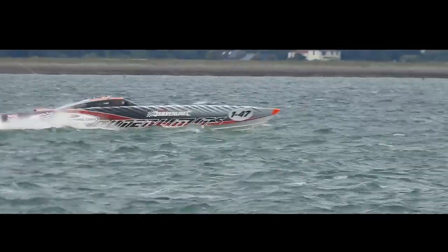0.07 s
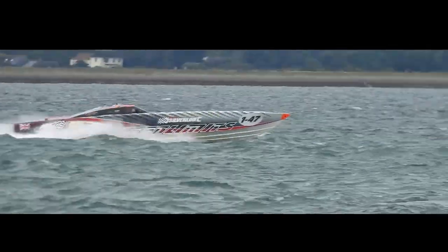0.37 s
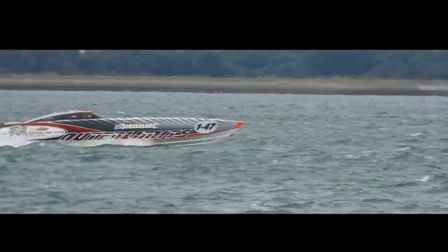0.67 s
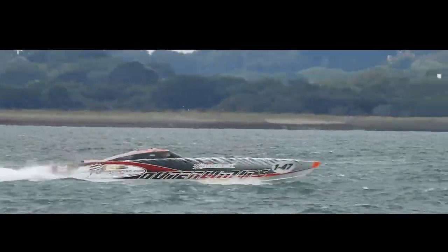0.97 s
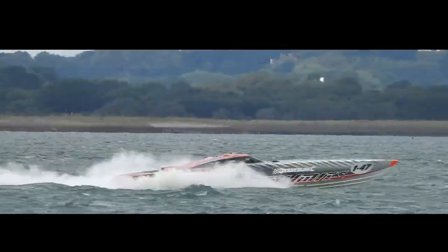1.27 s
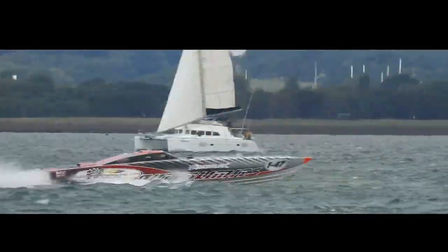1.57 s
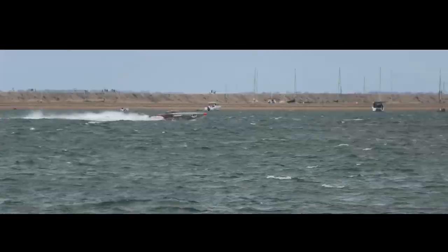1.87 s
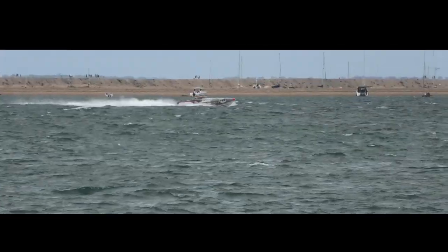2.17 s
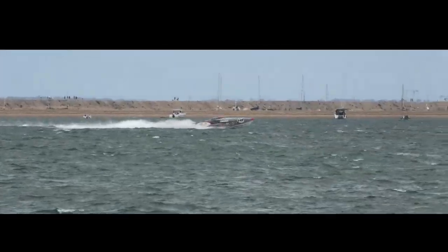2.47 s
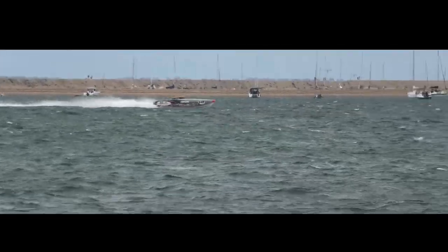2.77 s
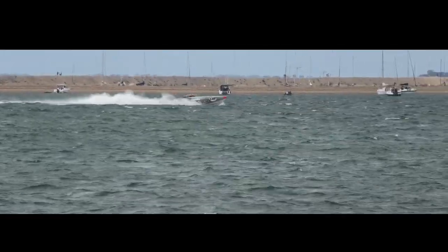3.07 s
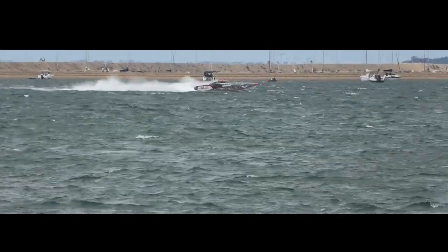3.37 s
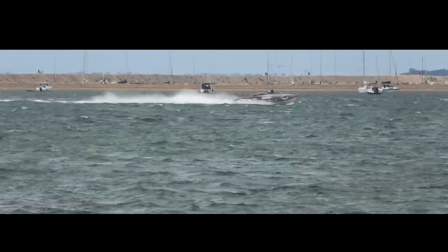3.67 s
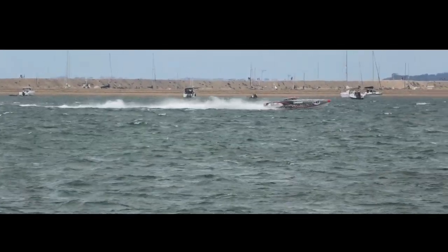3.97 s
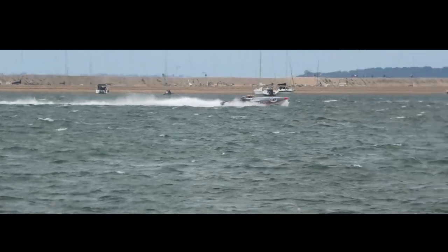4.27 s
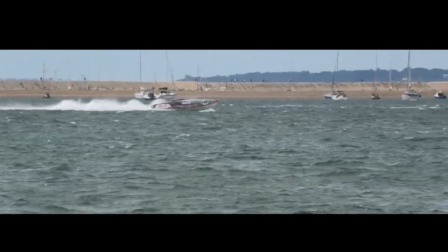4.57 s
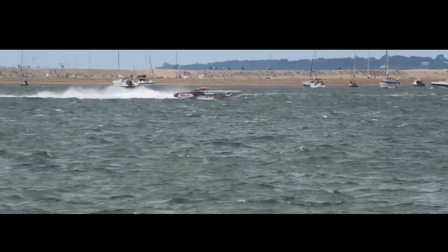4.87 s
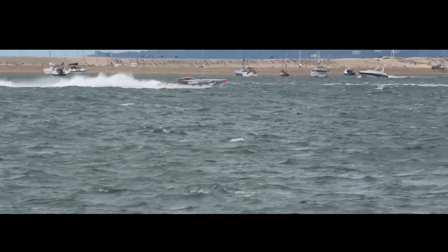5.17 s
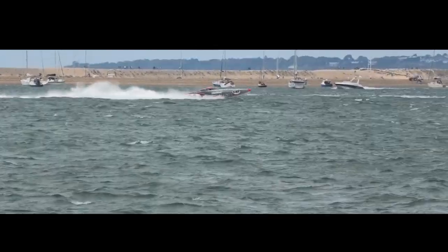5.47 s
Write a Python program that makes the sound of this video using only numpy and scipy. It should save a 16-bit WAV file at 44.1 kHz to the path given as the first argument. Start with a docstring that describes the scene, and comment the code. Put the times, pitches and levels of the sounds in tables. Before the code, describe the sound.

A racing powerboat engine drones past with hissing spray and wind buffeting the microphone, then gives way to gusts over faint distant rumble and waves.

```python
"""The V8 exhaust of a racing powerboat drones across choppy water, heard from a windy shore, near and then far.
Periodic cylinder firings give harmonics that follow the engine speed, over a burble of gas in water.
Near, drops of spray hiss and spatter while turbulent wind roars and knocks at the microphone ports.
Then the boat is a faint, distant rumble behind the wash of the waves, and gusts make a gain control
duck the water. A limiter holds down the peaks throughout."""
import sys
import numpy as np
from scipy import signal
from scipy.fft import rfft, irfft, next_fast_len
from scipy.io import wavfile
from scipy.ndimage import uniform_filter1d, minimum_filter1d, map_coordinates

SR = 44100
rng = np.random.default_rng(int(sys.argv[2]) if len(sys.argv) > 2 else 0)


def to_wav(sig):
    """Store sig (one row per channel, or 1-D mono) as 16-bit WAV at the path in sys.argv[1].

    Samples outside -1..1 are clipped; the rate is SR.
    """
    pcm = np.clip(np.atleast_2d(sig), -1, 1) * 32767
    pcm = np.round(pcm).astype(np.int16)
    wavfile.write(sys.argv[1], SR, pcm.T)  # frames by channels


N = 247842

NEAR_END_S, FAR_START_S = 1.837, 1.848
CRUISE_HZ = 32.74  # engine cycle rate of the distant boat
KNOCK_HZ, TEARING_HZ = 500, 600  # nominal centres of KNOCK_SPECTRUM and TEARING_SPECTRUM

# Levels in the tables are relative: trims, flutter and gain control act on them later.
# engine speed, rising as the propeller lifts clear, sagging as the hull digs in: (time [s], cycles [Hz])
ENGINE_SPEED = [(0, 32.6), (.132, 32.4), (.22, 32.7), (.29, 32.9), (.44, 33.2), (.51, 34.7), (.6, 34.9),
                (.744, 32.6), (.85, 33.5), (1.0, 32.1), (1.08, 32.9), (1.18, 31.8), (1.33, 33.5),
                (1.4, 32.2), (1.47, 31.9), (1.59, 32.1), (1.645, 33.4), (1.72, 31.7), (1.83, 31.6)]
# pulse strength of the eight cylinders within one cycle: (amplitude [ratio])
CYLINDER_STRENGTH = [0.92, 0.11, 0.39, 0.79, 0.6, 0.92, 0.57, 0.92]
# envelopes of the engine orders: (time [s], level [dB])
BANK_LEVEL = [(0, -23.5), (.1, -34), (.17, -30.5), (.3, -31), (.39, -28.5), (.44, -56), (.5, -28),
              (.59, -23), (.82, -27), (.88, -36.5), (1.2, -40), (1.28, -27.5), (1.46, -24.5), (1.56, -39),
              (1.63, -25.5), (1.7, -37.5), (1.77, -24), (1.83, -31)]
FIRING_LEVEL = [(0.0, -30.5), (.07, -22.5), (.16, -33), (.22, -24.5), (0.32, -22.5), (0.356, -38),
                (0.4, -23), (0.524, -41.5), (0.58, -30.5), (0.754, -34), (.86, -42.5), (.99, -25.5),
                (1.06, -32.5), (1.16, -26.5), (1.28, -39.5), (1.37, -19.5), (1.45, -42), (1.55, -32.5),
                (1.63, -24), (1.69, -34), (1.83, -40)]
NINTH_LEVEL = [(0, -36), (.18, -37.5), (.29, -31), (.35, -39), (.43, -31), (.5, -44), (.6, -42),
               (.73, -31.5), (.8, -46), (1.0, -38), (1.18, -36), (1.3, -45), (1.48, -44), (1.57, -31.5),
               (1.7, -43), (1.83, -47)]
# exhaust spectra: (frequency [Hz], level [dB])
NEAR_EXHAUST_SPECTRUM = [(50, -40.5), (85, -16), (100, -11.5), (135, -2), (200, 2.5), (300, -4), (370, -15),
                         (700, -18), (1500, -34), (4000, -65)]
FAR_EXHAUST_SPECTRUM = [(40, -38), (75, -24), (115, -4), (170, 6), (260, 1.5), (400, -4.5), (900, -19.5),
                        (3000, -41), (8000, -110)]

# wind envelopes: (time [s], level [dB])
NEAR_ROAR_LEVEL = [(0, -42), (.3, -35.5), (.42, -33.5), (.53, -34.5), (.6, -36), (.66, -35), (.8, -35.5),
                   (.87, -32.5), (1.05, -33), (1.25, -31.5), (1.37, -41), (1.49, -32), (1.68, -33),
                   (1.82, -32)]
BREEZE_LEVEL = [(1.85, -42.5), (2.2, -40), (2.42, -48), (2.62, -34.5), (2.85, -35.5), (3.06, -52.5),
                (3.27, -38), (3.5, -41), (3.62, -36.5), (4.05, -40), (4.32, -43), (4.48, -38.5),
                (4.6, -43.5), (4.88, -38.5), (5.2, -43), (5.6, -41.5)]
# veering of the breeze between the microphone ports: (time [s], left minus right [dB])
BREEZE_BALANCE = [(1.86, 2.5), (2.3, 1), (2.87, 5.0), (3.22, -2), (3.9, -1.5), (4.4, -0.5), (5.35, 0),
                  (5.6, 1)]
# brief changes in the breeze, mostly lulls: (mid time [s], duration [s], level change [dB])
BREEZE_LULLS = [(2.595, .018, -5), (4.17, 0.018, 1), (4.29, 0.025, -5), (4.775, 0.04, -2.5),
                (5, 0.017, -16), (5.509, 0.025, -2)]
# hard blasts of wind: (mid time [s], duration [s], level [dB], centre [Hz])
NEAR_BLASTS = [(0.149, 0.057, -34.5, 597), (0.364, 0.023, -31, 900), (0.436, 0.028, -38.5, 1210),
               (0.547, 0.069, -44.5, 1680), (0.644, .014, -38, 1000), (0.864, 0.033, -24, 623),
               (0.905, 0.02, -29.5, 1010), (0.945, 0.04, -30, 700), (1.011, 0.013, -33, 600),
               (1.054, 0.052, -41, 777), (1.468, 0.041, -32, 550.2), (1.595, 0.069, -36, 593),
               (1.657, 0.021, -38.5, 1100), (1.811, 0.029, -39, 950)]
# gusts: (mid time [s], duration [s], level [dB], left minus right [dB], relative fizz level [dB])
FAR_GUSTS = [(2.068, 0.029, -35, 8, -28), (2.28, 0.12, -30.5, 4, -27), (2.488, 0.064, -33.5, 3, -30),
             (2.644, 0.034, -29, 8, -36), (2.729, 0.15, -19, 3, -23), (2.939, 0.063, -21.5, 1, -22),
             (4.116, 0.06, -21.5, 2.5, -29.5), (4.206, 0.038, -23, -1.5, -20.5),
             (4.251, 0.051, -19.5, 2, -24), (4.685, 0.064, -38, -2, -28), (4.928, 0.016, -22, -9, -24.5),
             (4.965, 0.041, -21.5, 2, -25), (5.049, 0.075, -31, -4.5, -22), (5.129, 0.027, -24, 8.5, -35),
             (5.383, 0.059, -25.5, -2.5, -22), (5.454, 0.06, -29.5, 2.5, -30), (5.595, 0.073, -21, 5, -21)]
# impacts of the hardest eddies: (time [s], peak level [dB], left minus right [dB], centre [Hz])
HARD_KNOCKS = [(0.022, -23, 0, 533), (.134, -25, 4, 500), (.149, -25, 1, 596), (.216, -23.5, 1, 502),
               (.36, -25.5, -15, 970), (.397, -25.5, -3, 694), (.43, -22.5, -19, 884),
               (0.498, -24, 5.5, 605), (.638, -25, -5, 860), (0.747, -26.5, -2, 537), (.771, -22, 4, 595),
               (0.859, -7.5, 9, 538), (.939, -13, -17, 690), (.955, -13, 9.5, 700), (.975, -30, -10, 734),
               (1.003, -13.5, 5, 480), (1.033, -24, 18, 640), (1.193, -28, 4, 810), (1.222, -20, -10, 477),
               (1.252, -24.5, -18, 596), (1.494, -19, 3.5, 520), (1.773, -20, 8, 450),
               (1.797, -25.5, 9, 498), (2.06, -31, 12, 463), (2.298, -23, 9, 397), (2.637, -19, 8, 470),
               (2.691, -24, -2, 655), (2.717, -27, 5, 620), (2.755, -12, 13, 450), (2.798, -19, 6, 387),
               (2.927, -17.5, 7, 480), (2.998, -34.5, 9, 885), (3.27, -33, -6, 560), (3.315, -31.5, 1, 550),
               (3.823, -29.5, 1, 500), (4.098, -22, -5, 420), (4.11, -16.5, -12, 480),
               (4.192, -18.5, 4, 420), (4.25, -18, 4, 484), (4.924, -25.5, 6, 324), (4.932, -18, 9, 595),
               (4.955, -20, -7, 476), (5.013, -30, 0, 560), (5.034, -21.5, 8, 435), (5.121, -21, -12, 557),
               (5.298, -34, -2, 480), (5.341, -37, 9, 380), (5.362, -28, -3.5, 500), (5.448, -26, 3, 474),
               (5.47, -26, -1.5, 483), (5.562, -19, -2, 477)]
# wind snaps: (time [s], duration [s], peak level [dB], left minus right [dB], top octave gain [dB])
WIND_CRACKLES = [(0.356, 0.0024, -36.5, -10, -25), (0.645, .002, -41, 4, -16), (.67, .002, -40.5, 3, -24),
                 (.691, .002, -33.5, 2, -24), (.841, .0015, -38.5, -5.5, -21.5),
                 (0.898, 0.0027, -27.5, 34, -9.5), (.903, .004, -32, 19, -23.5),
                 (0.921, .003, -30.5, 38, -19), (0.923, .001, -35.5, -21, -5.5),
                 (1.128, .002, -35, -7, -28), (1.162, .002, -37, -8.5, -29), (1.194, .003, -39, 5, -28),
                 (1.269, 0.0045, -35, -25, -18.5), (1.417, 0.0022, -42, -15, -23),
                 (1.657, 0.0082, -35.5, 24, -20.5), (1.665, .0028, -17, 46, -32),
                 (1.675, .005, -38.5, 16, -19.5), (1.816, 0.0026, -33, 25, -22)]
# spectra of wind at the microphone: (frequency [Hz], level [dB])
RUMBLE_SPECTRUM = [(20, -33.5), (45, -14.5), (75, -12.5), (110, -2.5), (200, -7.5), (330, -1), (600, -36.5),
                   (2000, -61), (16000, -120)]
ROAR_SPECTRUM = [(40, -34.5), (120, -14), (250, -5), (420, 3.5), (750, -8.5), (1200, -12.5), (1800, -20),
                 (2300, -29), (4000, -37), (9000, -51.5), (16000, -62)]
TEARING_SPECTRUM = [(100, -41.5), (380, 2), (560, 2.5), (760, 3), (900, -4), (1150, -9), (1600, -18),
                    (2100, -27), (5000, -47.5), (16000, -76)]
BREEZE_SPECTRUM = [(30, -53), (65, -32), (110, -6), (170, 1.5), (250, 2.5), (480, 1.5), (800, -5.5),
                   (1300, -14.5), (2000, -27.5), (3000, -42.5), (4500, -48), (16000, -110)]
BUFFET_SPECTRUM = [(30, -39), (70, -52), (110, -17.5), (170, 3), (250, 5), (480, 4.5), (800, -4),
                   (1300, -13.5), (2000, -27), (3000, -41), (4500, -54), (16000, -99)]
FIZZ_SPECTRUM = [(600, -4), (1500, 13), (2600, 2), (3800, -10.5), (5500, -19.5), (16000, -40)]
KNOCK_SPECTRUM = [(30, -54), (65, -29), (110, -11.5), (200, 4.5), (500, 11), (900, 0.5), (1500, -15.5),
                  (2500, -29), (4500, -48.5), (10000, -58)]
CRACKLE_SPECTRUM = [(300, 2), (1200, 6.5), (2200, 6), (6500, -1)]
# likeness of the wind in the two channels: (frequency [Hz], correlation [-1 to 1])
ROAR_CORRELATION = [(60, 0.44), (150, 0.32), (260, 0.48), (500, 0.18), (1000, 0.097), (1900, 0.21)]
BREEZE_CORRELATION = [(100, 0.93), (260, -0.091), (500, -0.55), (1000, -0.46), (2500, -0.72)]
BUFFET_CORRELATION = [(120, 0.58), (260, -0.24), (500, -0.34), (1000, -0.34), (3000, 0.088)]

# water envelopes: (time [s], level [dB])
HISS_LEVEL = [(0, -52.5), (.25, -57), (.35, -55), (.45, -59.5), (.69, -54), (.8, -61), (.97, -70),
              (1.15, -63), (1.43, -57), (1.54, -65.5), (1.82, -59.5)]
WASH_LEVEL = [(1.86, -62.5), (2.15, -61), (2.5, -66), (2.9, -67.5), (3.05, -72), (3.35, -69.5),
              (3.85, -60.5), (4.1, -62.5), (4.4, -65), (4.88, -58.5), (5.1, -65), (5.6, -58.5)]
SEA_LEVEL = [(1.86, -61.5), (2.15, -59), (2.55, -65.5), (3.05, -71.5), (3.5, -67), (3.9, -71), (4.45, -64),
             (4.8, -60.5), (5.15, -64), (5.6, -64)]
# water spectra: (frequency [Hz], level [dB])
HISS_SPECTRUM = [(500, -33), (1500, 8.5), (2300, 4.5), (3300, 5), (3800, -1.5), (5000, 1.7), (6700, 2.5),
                 (7600, -8), (9500, -17.5), (15500, -34.5)]
SPATTER_SPECTRUM = [(700, -15.5), (1600, 2.5), (3000, 2), (6500, -1), (8000, -9.5), (15500, -20)]
WASH_SPECTRUM = [(300, -5), (900, 13), (1800, 15.5), (2800, 10), (4000, 4.5), (6500, 0.5), (9500, -1.5),
                 (12500, -6.5), (15500, -14)]
SEA_SPECTRUM = [(400, -16), (1000, 5.5), (2000, 0.5), (2900, -4.5), (3800, -10), (6000, -36), (16000, -45)]
# likeness of the water in the two channels: (frequency [Hz], correlation [-1 to 1])
HISS_CORRELATION = [(2000, 1), (4000, 0.7), (6000, 0.21), (12000, .2)]
WASH_CORRELATION = [(1000, .1), (3500, 0.39), (7000, 0.92)]
# brief high whistles: (mid time [s], duration [s], frequency [Hz], level [dB])
HIGH_SQUEAKS = [(0.366, 0.033, 6100, -46.5), (3.163, .008, 6400, -70), (3.354, 0.0045, 9600, -68)]


def near_engine():
    """Harmonics of the engine cycle: three strong orders swell and fade as the hull bounces."""
    cycles = np.cumsum(curve(ENGINE_SPEED)) / SR
    bank = amp(curve(BANK_LEVEL) - 4.5) * engine_order(cycles, order=5)
    firing = amp(curve(FIRING_LEVEL) - 4) * engine_order(cycles, order=8)
    ninth = amp(curve(NINTH_LEVEL) - 0.5) * engine_order(cycles, order=9)
    return bank + firing + ninth + amp(-29) * exhaust(cycles, NEAR_EXHAUST_SPECTRUM, burble=2.37)


def engine_order(cycles, order):
    """Phase modulation: turbulent air makes one harmonic wander on its way to each channel."""
    phase = 2 * np.pi * (order * cycles + rng.random())
    wander = 0.2 * wobble(16) + 0.3 * np.array([wobble(40), wobble(40)])
    return np.sqrt(2) * np.sin(phase + wander)


def exhaust(cycles, spectrum, burble):
    """Source and filter: firing pulses and the churn of gas blown through water share one spectrum."""
    pulses = unit(firings(cycles, scatter_db=7.5, jitter_s=0.0006))
    churn = noise(spectrum, [(150, 0.093), (280, 0.36), (500, 0.016)])
    return unit(unit(shaped(pulses, spectrum)) + burble * churn)


def firings(cycles, scatter_db, jitter_s):
    """A quasi-periodic pulse train: one impulse per cylinder firing, uneven in size and time."""
    count = len(CYLINDER_STRENGTH)
    index = np.arange(1, int(cycles[-1] * count))
    timing, strength = rng.standard_normal((len(index), 2)).T
    times = np.interp(index / count, cycles, clock()) + jitter_s * timing
    sizes = np.take(CYLINDER_STRENGTH, index % count) * amp(scatter_db * strength)
    return np.bincount(np.clip(times * SR, 0, N - 1).astype(int), sizes, N)


def far_engine():
    """Attenuation with distance: the exhaust loses its edge and leaves a faint rumble."""
    cycles = np.cumsum(CRUISE_HZ + 0.8 * wobble(3.2)) / SR
    return amp(-54.5 + 0.35 * wobble(3.62)) * exhaust(cycles, FAR_EXHAUST_SPECTRUM, burble=0.49)


def near_wind():
    """Turbulent pressure at the ports: a rumble, a roar of quick eddies and blasts that tear."""
    rumble = amp(-31.5) * noise(RUMBLE_SPECTRUM, [(60, 0.93), (150, 0.17)], amp(3.4 * wobble(13.12)))
    eddies = amp(5.5 * np.tanh(wobble(130)) + 2.76 * wobble(800))
    roar = shifting_colour(noise(ROAR_SPECTRUM, ROAR_CORRELATION, eddies), depth_db=4.5)
    turbulence = noise([(100, 0.014), (16000, 0.0037)], ROAR_CORRELATION, amp(8.2 * np.tanh(wobble(300))))
    tearing = np.zeros((2, N))
    for s, length, db, centre_hz in NEAR_BLASTS:
        blast = unit(shaped(turbulence, TEARING_SPECTRUM, transpose=centre_hz / TEARING_HZ))
        tearing += amp(db) * swell(s, length) * blast
    return rumble + amp(curve(NEAR_ROAR_LEVEL)) * unit(roar) + tearing


def breeze():
    """Amplitude-modulated flow noise: the breeze flutters, veers between ports and drops into lulls."""
    lull_db = sum(db * swell(s, length) for s, length, db in BREEZE_LULLS)
    veer_db = curve(BREEZE_BALANCE)
    level_db = curve(BREEZE_LEVEL) + lull_db + np.array([veer_db, -veer_db]) / 2
    flutter = amp(1.47 * wobble(22.12) + 2 * wobble(200))
    return amp(level_db) * noise(BREEZE_SPECTRUM, BREEZE_CORRELATION, flutter)


def gusts(fizz_lead_s=0.008):
    """Bursts of turbulence: each gust fizzes on its leading edge and buffets the microphone."""
    eddies = amp(3.1 * np.tanh(wobble(260)))
    ragged = amp(2 * np.tanh(wobble(110)))
    buffet = noise(BUFFET_SPECTRUM, BUFFET_CORRELATION, eddies * ragged)
    fizz = noise(FIZZ_SPECTRUM, BUFFET_CORRELATION, eddies ** 2)
    out = np.zeros((2, N))
    for s, length, db, balance_db, fizz_db in FAR_GUSTS:
        body = swell(s, length, edge=2.47) * buffet
        front = amp(fizz_db) * swell(s - fizz_lead_s, length, edge=2.3) * fizz
        out += amp(db) * panned(balance_db) * (body + front)
    return amp(-2) * out


def knocks(attack_s, decay_s):
    """Impulsive excitation: an eddy hits the ports with a dull pop, each pop at its own pitch."""
    out = np.zeros((2, N + SR))
    size, lead = 2048, 512  # samples in a pop, and before its onset
    t = np.maximum(np.arange(size) - lead, 0) / SR
    envelope = (1 - np.exp(-t / attack_s)) * np.exp(-t / decay_s)
    for s, db, balance_db, centre_hz in HARD_KNOCKS + lesser_eddies():
        colour = amp(along(KNOCK_SPECTRUM, np.fft.rfftfreq(size, 1 / SR) * KNOCK_HZ / centre_hz))
        burst = envelope * (rng.standard_normal(size) + 1.24 * rng.standard_normal((2, size)))
        pop = irfft(rfft(burst) * colour)
        pop /= np.abs(pop).max(axis=1, keepdims=True)
        start = max(0, round(s * SR) - lead)
        out[:, start:start + size] += amp(db) * panned(balance_db) * pop
    return out[:, :N]


def lesser_eddies(per_s=5.8, near_db=-29.5, over_breeze_db=5, spread_db=1.5):
    """Random arrivals, as rows like HARD_KNOCKS; once the boat is far their level follows the breeze."""
    rows = []
    for when, strength, side in rng.random((round(per_s * N / SR), 3)):
        s = when * N / SR
        db = near_db if s < NEAR_END_S else np.interp(s, *np.transpose(BREEZE_LEVEL)) + over_breeze_db
        rows.append((s, db + spread_db * (2 * strength - 1), 6 * (2 * side - 1), KNOCK_HZ))
    return rows


def crackles():
    """Broadband transients: millisecond snaps, each louder at the port that the wind strikes."""
    out = np.zeros((2, N))
    for s, length, db, balance_db, top_db in WIND_CRACKLES:
        burst = rng.standard_normal(N) * swell(s, length)
        snap = shaped(burst, CRACKLE_SPECTRUM + [(8500, top_db)])
        out += amp(db) * panned(balance_db) * snap / np.abs(snap).max()
    return out


def spray(ticks_per_s=110):
    """Incoherent summation: countless drops merge into a surging hiss, with tiny separate ticks."""
    surges = amp(1.5 * wobble(70) + 3 * wobble(700))
    hiss = amp(curve(HISS_LEVEL) + 4.5) * noise(HISS_SPECTRUM, HISS_CORRELATION, surges)
    drops = (rng.random(N) < ticks_per_s / SR) * rng.random(N)
    ticks = noise([(1000, 4), (6000, 3), (15000, 11)], [(1000, 0.28)], drops)
    return hiss + amp(-75) * ticks


def spatter(drops_per_s=220, spread_db=3.5, decay_s=0.0004):
    """Shot noise: drops of uneven size strike at random, independently left and right."""
    hits = rng.random((2, N)) < drops_per_s / SR
    sizes = amp(spread_db * np.minimum(rng.exponential(size=(2, N)), 3))
    envelope = signal.lfilter([1], [1, -np.exp(-1 / (decay_s * SR))], hits * sizes)
    return amp(-64) * unit(shaped(envelope * rng.standard_normal((2, N)), SPATTER_SPECTRUM))


def waves():
    """Slowly modulated broadband noise: small waves wash along the shore and the open sea rushes."""
    wash = amp(curve(WASH_LEVEL)) * noise(WASH_SPECTRUM, WASH_CORRELATION, amp(1.3 * wobble(760)))
    sea = amp(curve(SEA_LEVEL) - 0.5) * noise(SEA_SPECTRUM, [(1000, 0.2), (2500, 1)])
    return wash * panned(-1.7) + sea


def squeaks(waver_rad):
    """Random phase modulation makes short, high whistles unsteady."""
    out = np.zeros(N)
    for s, length, hz, db in HIGH_SQUEAKS:
        phase = 2 * np.pi * hz * clock() + waver_rad * wobble(hz / 10)
        out += amp(db) * swell(s, length) * np.sin(phase)
    return out


def gain_control(x, knee_db=-39, slope=0.44, attack_s=0.014, recovery_db_per_s=87):
    """Compression: power above the knee quickly turns both channels down; the gain then creeps back."""
    power = np.abs(uniform_filter1d(np.mean(x ** 2, axis=0), size=500))
    reduction_db = slope * np.maximum(10 * np.log10(power + 1e-12) - knee_db, 0)
    recovery_db = recovery_db_per_s * clock()
    held_db = np.maximum.accumulate(reduction_db + recovery_db) - recovery_db
    lag = np.exp(-1 / (attack_s * SR))
    return x * amp(-signal.lfilter([1 - lag], [1, -lag], held_db))


def limiter(x, ceiling_db, window):
    """Peak limiting: each channel is turned down just enough to stay under the ceiling."""
    needed = np.minimum(1, amp(ceiling_db) / (np.abs(x) + 1e-9))
    return x * uniform_filter1d(minimum_filter1d(needed, window), window // 2)


def noise(spectrum, correlation, flutter=1):
    """Partial coherence: mid and side noise mix to a (frequency [Hz], correlation) curve, at rms 1."""
    def response(hz):
        angle = np.arccos(np.clip(along(correlation, hz), -1, 1)) / 2
        return amp(along(spectrum, hz)) * [np.cos(angle), np.sin(angle)]
    mid, side = filtered(flutter * rng.standard_normal((2, N)), response)
    return unit(np.array([mid + side, mid - side]))


def shifting_colour(x, depth_db):
    """Spectral modulation: smooth random gains over frequency and time vary the timbre."""
    frames = signal.stft(x, nperseg=1024)[2]
    field = rng.standard_normal(frames.shape[1:])
    field = uniform_filter1d(uniform_filter1d(field, size=5, axis=0), size=5, axis=1)
    return signal.istft(frames * amp(depth_db * np.tanh(unit(field))), nperseg=1024)[1][:, :N]


def shaped(x, spectrum, transpose=1):
    """Spectral shaping by (frequency [Hz], level [dB]) points, transposed by a frequency ratio."""
    return filtered(x, lambda hz: amp(along(spectrum, hz / transpose)))


def filtered(x, response):
    """Linear filtering: the spectrum of x is multiplied by a frequency response."""
    size = next_fast_len(N + SR // 2)
    return irfft(rfft(x, size) * response(np.fft.rfftfreq(size, 1 / SR)), size)[..., :N]


def swell(at_s, length_s, edge=2):
    """A generalised Gaussian envelope; a higher edge gives a flatter top and steeper sides."""
    return np.exp(-np.minimum(np.abs(2 * (clock() - at_s) / length_s) ** edge, 50))


def wobble(rate):
    """A smooth random modulator, rate knots a second."""
    return map_coordinates(rng.standard_normal(int(N * rate / SR) + 4), [clock() * rate])


def panned(balance_db):
    """Constant-power gains for a left-minus-right level difference."""
    return unit(amp(np.array([[balance_db], [-balance_db]]) / 2))


def along(points, hz):
    """Interpolation of (frequency [Hz], value) points on a logarithmic axis."""
    frequencies, values = np.transpose(points)
    return np.interp(np.log(hz + 1), np.log(frequencies + 1), values)


def curve(points):
    """Interpolation of (time [s], value) points at every sample."""
    return np.interp(clock(), *np.transpose(points))


def amp(db):
    """Decibels to amplitude ratio."""
    return 10 ** (np.asarray(db) / 20)


def unit(x):
    """Normalisation to rms 1."""
    return x / np.sqrt(np.mean(x ** 2) + 1e-20)


def clock():
    """The time of every sample [s]."""
    return np.arange(N) / SR


def scene():
    """Superposition: the near pass, a brief dip, then the far scene, where gusts duck the water."""
    near_gate = np.clip((NEAR_END_S - clock()) / 0.002, 0, 1)
    far_gate = curve([(NEAR_END_S - 0.002, 0), (NEAR_END_S, 0.25),
                      (FAR_START_S - 0.001, 0.25), (FAR_START_S, 1)])
    near = near_engine() + near_wind() + spray() + spatter() + crackles()
    far = breeze() + gusts() + waves() + far_engine()
    transients = squeaks(waver_rad=3.4) + knocks(attack_s=0.00038, decay_s=0.0024)
    return near_gate * (near + transients) + gain_control(far_gate * (far + transients))


def record(dry):
    """Finite headroom and bandwidth: loud peaks are limited and the highest treble is removed."""
    top_hz = 15800
    held = limiter(dry, ceiling_db=-15.5, window=400)
    return filtered(held, lambda hz: hz < top_hz)


dry = scene()
out = record(dry)
to_wav(out)
```